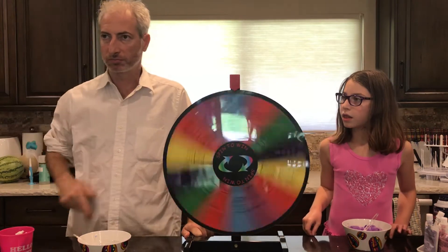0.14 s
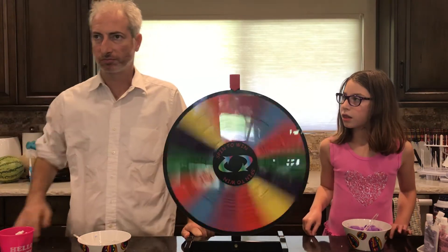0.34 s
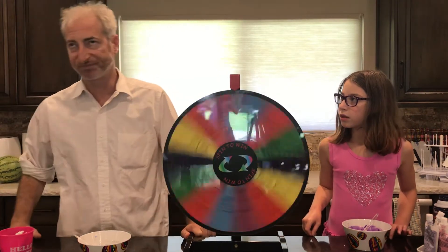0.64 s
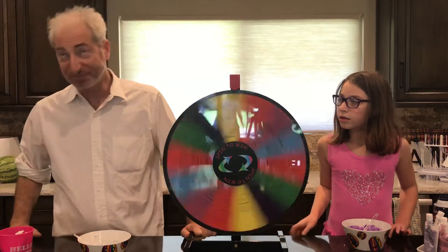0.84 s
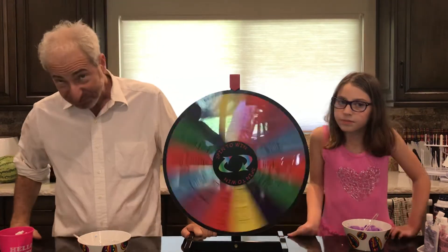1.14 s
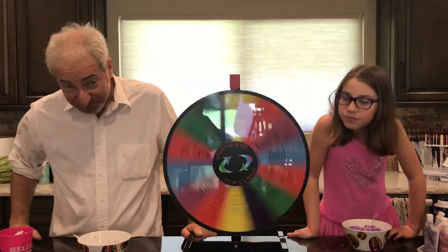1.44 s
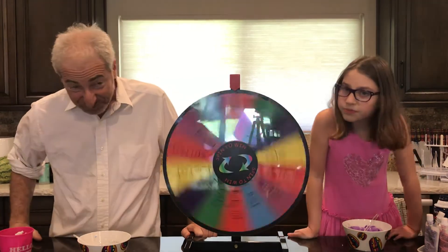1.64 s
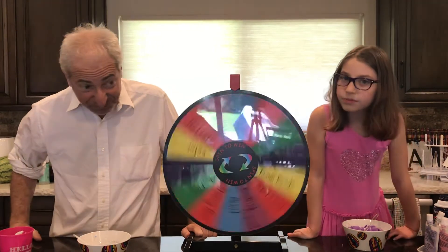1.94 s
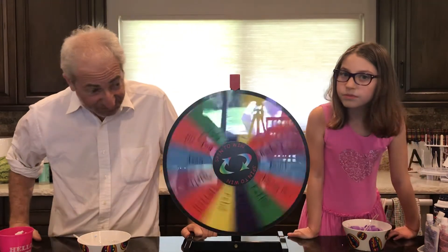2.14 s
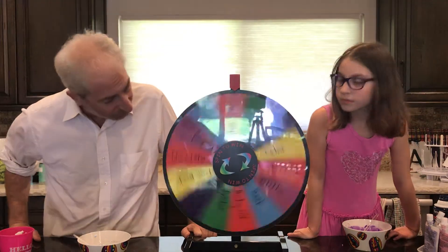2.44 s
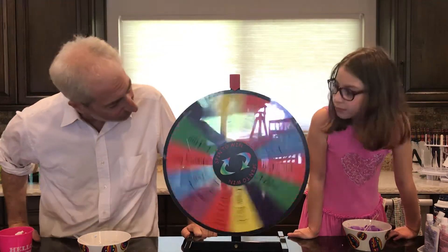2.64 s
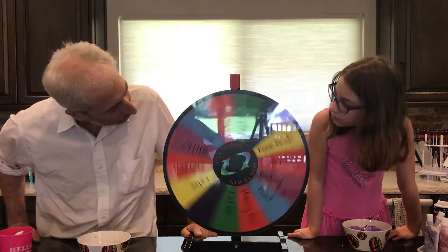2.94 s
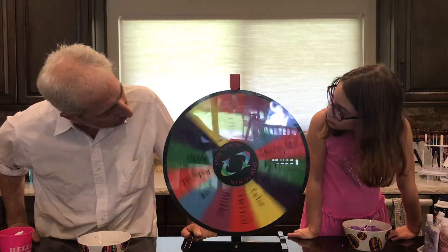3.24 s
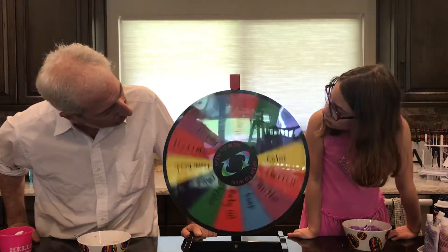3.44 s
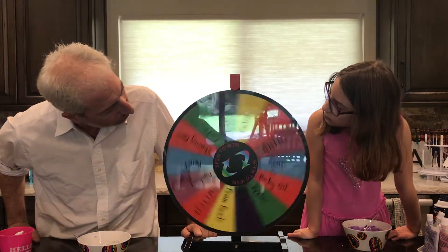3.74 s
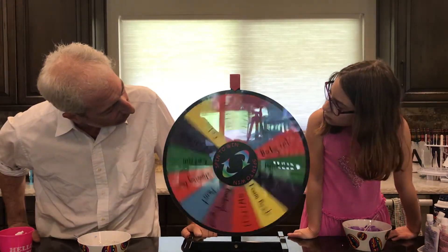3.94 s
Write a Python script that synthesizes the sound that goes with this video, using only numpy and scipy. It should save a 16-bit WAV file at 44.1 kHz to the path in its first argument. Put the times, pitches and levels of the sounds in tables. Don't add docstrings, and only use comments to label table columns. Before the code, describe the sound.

A tabletop prize wheel is already spinning fast in a hard-walled kitchen. Its flapper snaps over pegs in a dense, bright rattle that slows smoothly into countable clicks, each with a light low thump from the stand. A loose part knocks about once a turn early on. A phone some metres away picks up strong reflections and faint fridge hum.

```python
import sys
import numpy as np
from scipy import signal
from scipy.fft import rfft, irfft
from scipy.io import wavfile

SR = 44100
rng = np.random.default_rng(int(sys.argv[2]) if len(sys.argv) > 2 else 0)


def dump_mix(stems):
    frames = np.atleast_2d(stems).T
    limited = np.clip(frames, -1, 1)
    pcm = np.round(limited * 32767).astype(np.int16)
    wavfile.write(sys.argv[1], SR, pcm)


def decibels_to_gain(level_db):
    exponent = np.asarray(level_db, float) / 20
    return 10 ** exponent


N = 180610
LEAD = SR // 2


def unit(x):
    return x / np.sqrt(np.sum(x ** 2, axis=-1, keepdims=True))


def colour(x, points):
    hz, db = np.transpose(points)
    grid_hz = np.arange(1, 514) * SR / 1024
    log_gain = np.interp(np.log(grid_hz), np.log(hz), db) * np.log(10) / 20
    cepstrum = irfft(log_gain)
    cepstrum[1:512] *= 2
    cepstrum[513:] = 0
    impulse = irfft(np.exp(rfft(cepstrum)))
    return signal.fftconvolve(x, np.atleast_2d(impulse), axes=-1)[:, :x.shape[-1]]


def fade(t, t60_s):
    return np.exp(-np.log(1000) * t / t60_s)


def rings(modes, t):
    hz, level_db, t60_s = np.transpose(modes)[:, :, None]
    return decibels_to_gain(level_db) * unit(fade(t, t60_s) * np.sin(2 * np.pi * hz * t))


def place(times_s, sounds):
    track = np.zeros(LEAD + N + sounds.shape[1])
    for start_s, sound in zip(times_s, sounds):
        i = LEAD + int(start_s * SR)
        track[i:i + len(sound)] += sound
    return track[:LEAD + N]


def chatter(count, t, bounce_s, bounce_db):
    noise = np.diff(rng.standard_normal((count, len(t) + 1)))
    rattle = noise * np.exp(-t / bounce_s)
    return (t == 0) + decibels_to_gain(bounce_db) * unit(rattle)


# snap_db, thump_db
PEGS = [(-0.5, -1.1), (-0.3, -0.5), (-1.1, -2.5), (0, -1.2), (-0.7, -0.6), (-0.5, 0.1), (-0.94, 1),
        (-.5, -1), (-0.2, 1), (0.1, 0.2), (-0.5, 0), (-0.65, -0.6), (-0.4, -3), (-0.5, -0.6)]


def peg_times(start_pegs_s=29.1772, friction_pegs_s2=4.5394, drag_per_s=.0361,
              lopsided_pegs_s2=2.8794, lopsided_peg=4.4611, steps=8):
    times_s, s, speed, bit = [], 0., start_pegs_s, 0
    while s < N / SR:
        if bit % steps == 0:
            times_s.append(s)
        tilt = np.sin(2 * np.pi * ((bit + .5) / steps - lopsided_peg) / len(PEGS))
        brake = friction_pegs_s2 + drag_per_s * speed + lopsided_pegs_s2 * tilt
        slower = np.sqrt(speed ** 2 - 2 * brake / steps)
        s += 2 / steps / (speed + slower)
        speed = slower
        bit += 1
    return np.array(times_s)


def peg_passes(earlier_gap_s=.034):
    ahead, before = peg_times(), -np.arange(1, len(PEGS))
    s = np.concatenate([ahead, before * earlier_gap_s])
    order = np.concatenate([np.arange(len(ahead)), before]) % len(PEGS)
    snap_db, thump_db = np.array(PEGS)[order].T
    return s, snap_db, thump_db


SNAP_DB = -21
# pitch_hz, level_db, t60_s
DISC_MODES = [(1900, -16, .03), (2030, -12, .04), (3090, -8, .05), (3245, -6, .1), (3340, -1, .02),
              (3400, -1, .07), (3685, -6, .1), (3925, 0, .16), (4200, -2, .07), (4290, -4, .05),
              (4520, -4, .06), (4750, -6, .02), (5205, -14, .04), (5465, -10, .06), (8320, -12, .03),
              (12500, -13, .02)]
# freq_hz, density_db_per_hz
SNAP_COLOUR = [(300, -40.5), (480, -27.5), (560, -27), (650, -19.5), (780, -28), (1000, -16.5),
               (1250, -18.5), (1650, -16), (2000, -4.5), (2750, -16), (3200, -10.5), (4700, -4),
               (5100, -7.5), (6300, -11), (9800, -11), (10600, -14.5), (13000, -11.5)]
# pitch_hz, drift_db_per_s
SLOWING_DRIFT = [(2030, -1), (3245, 1.5), (3340, -2), (3685, 2), (3925, -1), (4200, 0.6), (4290, -4.5),
                 (4750, 2.5), (5205, 0.5)]


def flapper_ticks(ring_db=-5, scatter_db=0.5, bounce_s=.0015, bounce_db=-7.5, same_aim=1.63, sides=3,
                  uneven_db=0.12, snap_db_per_s=-0.13, slip_s=-.0003):
    s, snap_db, _ = peg_passes()
    t = np.arange(8192) / SR
    snap = unit(colour(chatter(len(s), t, bounce_s, bounce_db), SNAP_COLOUR))
    drift_db = np.interp(np.transpose(DISC_MODES)[0], *np.transpose(SLOWING_DRIFT))
    luck = rng.standard_normal((len(s), 2, len(DISC_MODES)))
    stir = np.sign(luck[:, 0]) * decibels_to_gain(scatter_db * luck[:, 1] + s[:, None] * drift_db)
    ring = unit(stir @ rings(DISC_MODES, t))
    aim = unit(same_aim + rng.standard_normal((len(s), sides)))
    tick_db = SNAP_DB + snap_db_per_s * s + snap_db + uneven_db * luck[:, 0, 0]
    ticks = decibels_to_gain(tick_db)[:, None] * (snap + decibels_to_gain(ring_db) * ring)
    heard_s = s + slip_s
    aimed = [place(heard_s, share[:, None] * ticks) for share in aim.T]
    return place(heard_s, ticks), aimed, luck[:, 0, 1]


# pitch_hz, level_db, t60_s, sign
STAND_MODES = [(134, -11, .25, 1), (178, -11, .2, 1), (231, -11.5, .19, 1), (307, -9, .5, -1),
               (325, 0, .14, -1), (351, -2.5, .22, 1), (392, -16, .1, -1)]


def stand_thumps(luck, start_db=-48.5, thump_db_per_s=-0.3, uneven_db=0.95):
    s, _, thump_db = peg_passes()
    t = np.arange(8192) / SR
    modes = np.array(STAND_MODES)
    thump = unit(modes[:, -1] @ rings(modes[:, :-1], t))
    level_db = start_db + thump_db_per_s * s + thump_db + uneven_db * luck
    return place(s, decibels_to_gain(level_db)[:, None] * thump)


# freq_hz, gain_db
DIRECT_COLOUR = [(400, -12), (1000, -6), (2000, -20), (4000, -19), (7000, -13), (12000, -12)]


def direct_path(ticks):
    return colour(ticks[None], DIRECT_COLOUR)[0]


# freq_hz, gain_db
COUNTER_COLOUR = [(1200, -30), (2000, -22), (2700, -17), (3400, -9), (4600, -8), (6000, -16), (12000, -20)]


def counter_bounce(ticks, late_s=0.0025):
    return np.roll(colour(ticks[None], COUNTER_COLOUR)[0], int(late_s * SR))


# late_s, pitch_hz, under_tick_db, drift_db_per_s, t60_s
PEG_PINGS = [
    (.0045, 3400, -2, -1.5, .014),
    (.003, 4300, -12, 2.2, .014),
    (.0138, 4300, -13, 2.2, .014),
]


def peg_pings(scatter_db=-0.5):
    s, t, track = peg_times(), np.arange(2048) / SR, 0
    chance = rng.standard_normal((len(s), len(PEG_PINGS)))
    for (late_s, hz, under_db, db_per_s, t60_s), luck in zip(PEG_PINGS, chance.T):
        ping = unit(t * fade(t, t60_s) * np.sin(2 * np.pi * hz * t))
        level_db = SNAP_DB + under_db + db_per_s * s + scatter_db * luck
        track = track + place(s + late_s, decibels_to_gain(level_db)[:, None] * ping)
    return track


# late_s, level_db
ECHOES = [
    (.0065, -6),
    (0.0125, 9),
    (0.023, 4),
]
# centre_hz, t60_s
TAIL_OCTAVES = [(500, 0.83), (1000, 1), (2000, 0.53), (4000, 1), (8000, 0.81), (14000, 0.23)]


def kitchen(echo_db=-12, spread_s=0.00087, rise_s=0.00057, early_t60_s=0.28, early_db=4.0):
    t = np.arange(SR) / SR
    noise = rng.standard_normal((len(TAIL_OCTAVES) + 2, SR))
    tail = 0
    for row, (hz, t60_s) in zip(noise, TAIL_OCTAVES):
        edges_hz = [hz / np.sqrt(2), min(hz * np.sqrt(2), .45 * SR)]
        band = signal.butter(2, edges_hz, "band", fs=SR, output="sos")
        tail = tail + signal.sosfilt(band, row) * fade(t, t60_s)
    rise = 1 - np.exp(-t / rise_s)
    early = noise[-1] * fade(t, early_t60_s) * rise
    field = unit(tail * rise) + decibels_to_gain(early_db) * unit(early)
    for late_s, level_db in ECHOES:
        puff = (t >= late_s) * np.exp(-np.abs(t - late_s) / spread_s)
        field = field + decibels_to_gain(echo_db + level_db) * unit(puff * noise[-2])
    return field


# freq_hz, density_db_per_hz
HUM_COLOUR = [(25, -42), (45, -5), (70, -9), (128, 0), (180, -3), (260, -4), (400, -13), (700, -18),
              (1500, -17.5), (4000, -98)]


def fridge(hum_db=-46.5, hiss_db=-60):
    hz, db = np.transpose(HUM_COLOUR)
    grid_hz = np.arange(1, N // 2 + 2) * SR / N
    shape = decibels_to_gain(np.interp(np.log(grid_hz), np.log(hz), db))
    hum = irfft(shape * rfft(rng.standard_normal(N)), N)
    return unit(hum) * np.sqrt(N) * decibels_to_gain(hum_db) + decibels_to_gain(hiss_db) * rng.standard_normal(N)


# start_s, level_db
AXLE_KNOCKS = [
    (0.159, -22),
    (0.68, -23),
    (1.267, -23.5),
    (1.935, -29.5),
]
# freq_hz, density_db_per_hz
KNOCK_COLOUR = [(600, -31.5), (1300, -11.5), (2000, -12), (4000, -6), (7000, -11), (10000, -26),
                (15000, -13.5)]


def axle_knocks(bounce_s=0.0012, bounce_db=-6):
    start_s, level_db = np.transpose(AXLE_KNOCKS)
    t = np.arange(2048) / SR
    blows = unit(colour(chatter(len(start_s), t, bounce_s, bounce_db), KNOCK_COLOUR))
    return place(start_s, decibels_to_gain(level_db)[:, None] * blows)


def scene(wheel_db=24, thump_gain_db=44):
    ticks, aimed, luck = flapper_ticks()
    thumps = stand_thumps(luck)
    aimed[0] = aimed[0] + axle_knocks()
    heard = sum(signal.fftconvolve(track, kitchen())[:LEAD + N] for track in aimed)
    heard = heard + direct_path(ticks) + counter_bounce(ticks)
    hum = fridge()
    heard = heard + peg_pings()
    return (decibels_to_gain(wheel_db) * heard[LEAD:] + decibels_to_gain(thump_gain_db) * thumps[LEAD:] + hum)[None]


def low_pass(x):
    return signal.sosfilt(signal.butter(12, 16840, fs=SR, output="sos"), x)


def record(dry, bass_hz=60, top_hz=15650, dip_hz=4785, dip_width_hz=57, dip_share=0.47):
    thin = signal.sosfilt(signal.butter(2, bass_hz, "high", fs=SR, output="sos"), dry)
    peak = signal.iirpeak(dip_hz, dip_hz / dip_width_hz, fs=SR)
    thin = thin - dip_share * signal.lfilter(*peak, thin)
    cut = signal.sosfilt(signal.ellip(8, .2, 60, top_hz, fs=SR, output="sos"), thin)
    return low_pass(cut)


dry = scene()
out = record(dry)
dump_mix(out)
```